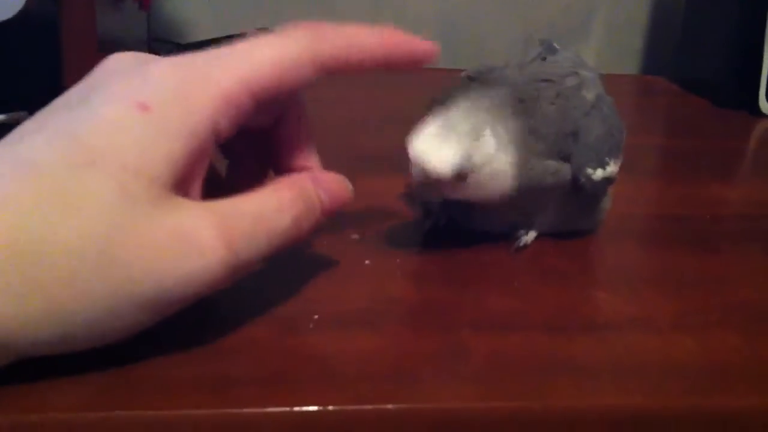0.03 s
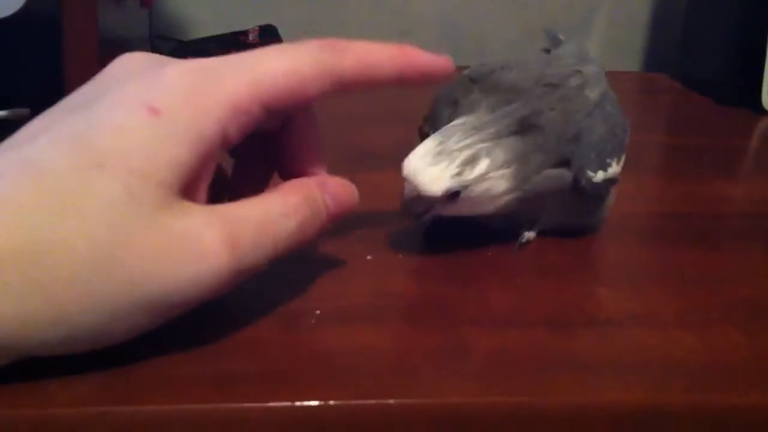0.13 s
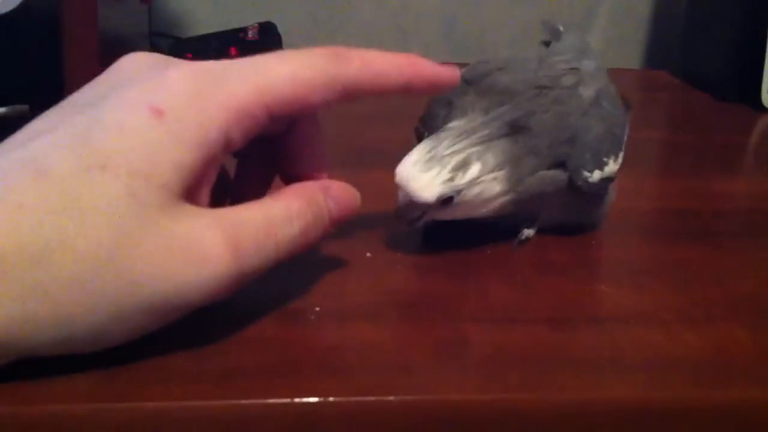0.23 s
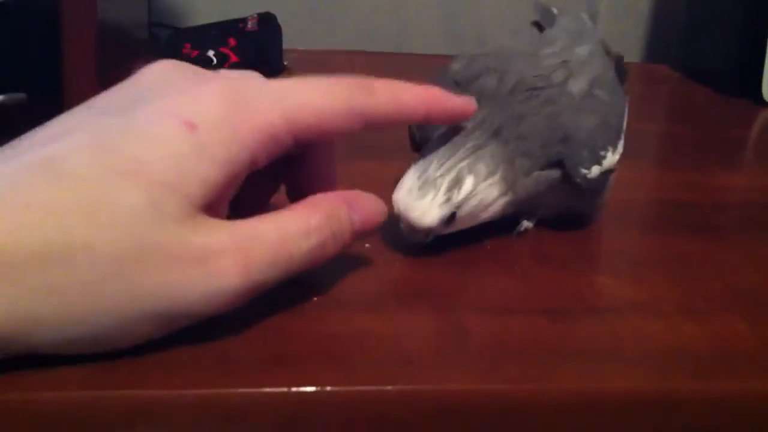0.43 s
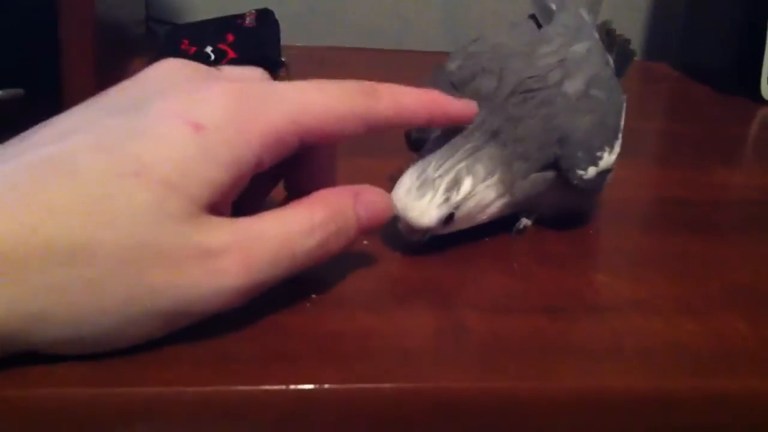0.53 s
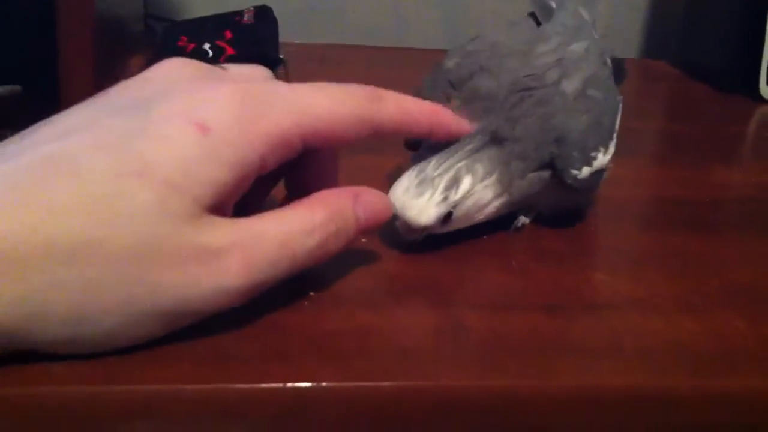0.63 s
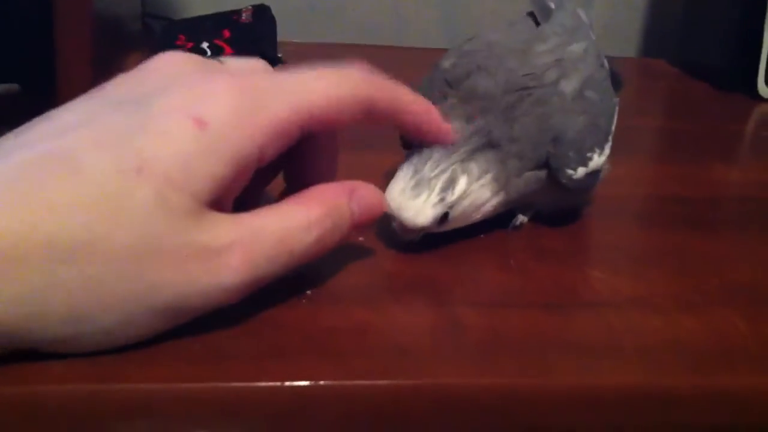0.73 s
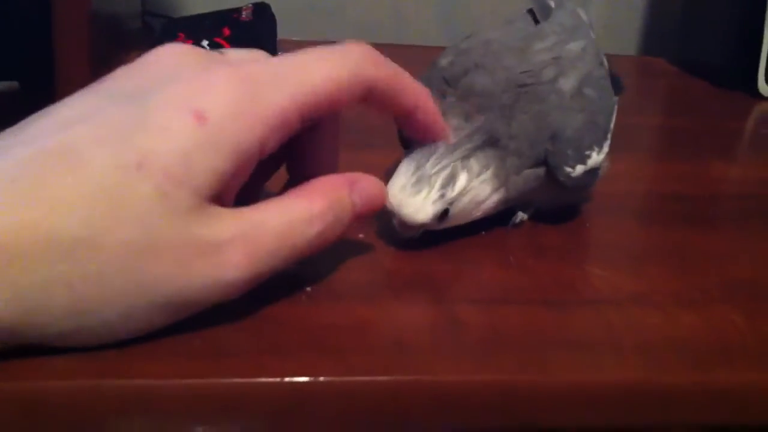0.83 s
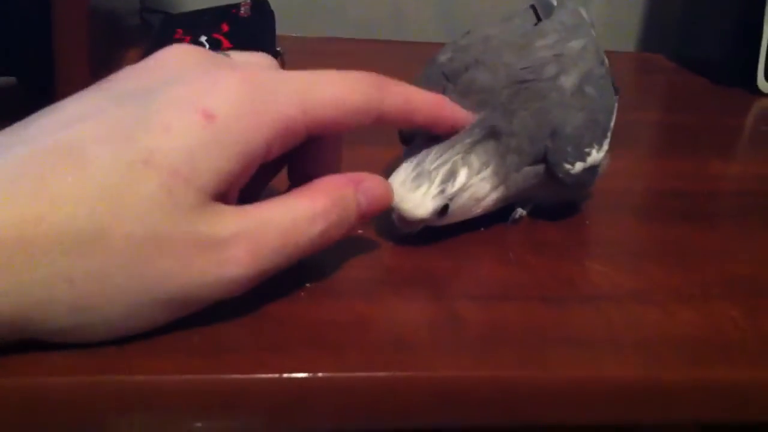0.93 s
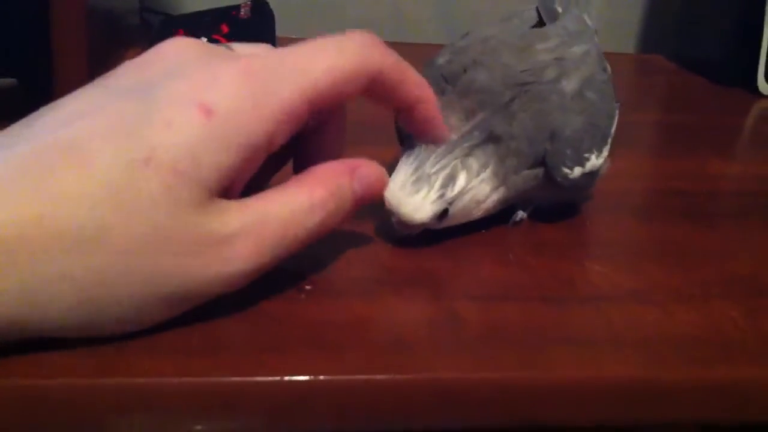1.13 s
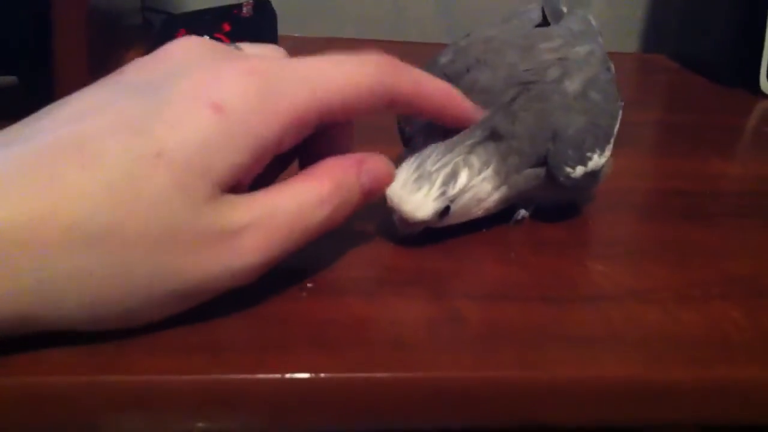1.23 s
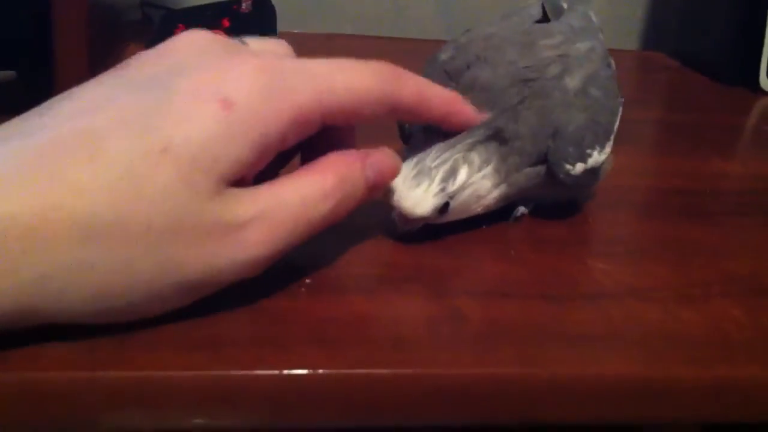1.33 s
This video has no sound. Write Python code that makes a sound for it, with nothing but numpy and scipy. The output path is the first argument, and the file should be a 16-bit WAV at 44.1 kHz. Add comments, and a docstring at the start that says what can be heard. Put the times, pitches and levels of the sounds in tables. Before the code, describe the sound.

A cockatiel close by gives a brief, hoarse, crackling hiss that tightens into a few broken squeaks, then one louder, very short squawk. The small room is quiet, with a faint fan and electrical hum.

```python
"""A hoarse, crackling hiss tightens into a few broken squeaks, then one very short, sharp squawk.
It is a cockatiel on a wooden table in a small quiet room, protesting at being touched.
The hiss is air rushing through its throat; the squeaks and squawk come from a trembling membrane
in its voice box. The room rings briefly; a fan and mains hum sound faintly behind."""
import sys
import numpy as np
from scipy import signal
from scipy.fft import rfft, irfft
from scipy.io import wavfile
from scipy.ndimage import uniform_filter1d, map_coordinates

SR = 44100
rng = np.random.default_rng(int(sys.argv[2]) if len(sys.argv) > 2 else 0)


def log_audio(samples):
    """Write samples as a 16-bit WAV file to the path given in sys.argv[1]."""
    # one column per channel
    frames = np.atleast_2d(samples).T
    # limit to full scale, then quantise
    limited = np.clip(frames, -1, 1)
    pcm = np.round(limited * 32767).astype(np.int16)
    wavfile.write(sys.argv[1], SR, pcm)


N = 61739
T = np.arange(N) / SR

# The throat's upper resonances (frequencies at which it rings), shared by the hiss and its crackles.
# Each row: frequency in Hz, relative width, relative level in dB.
UPPER_RESONANCES = [(3996, 264, 6), (4380, 470, -0.5), (4750, 790, -4.5), (7470, 610, -14),
                    (11570, 690, -20.5)]


def from_db(db):
    """Turn decibels into a factor to multiply by."""
    return 10 ** (np.asarray(db) / 20)


def rms_one(x):
    """Scale a signal to an average power of 1."""
    return x / np.sqrt(np.mean(x ** 2) + 1e-20)


def in_time(rows):
    """Join rows that start with a time into one curve for each further column."""
    times, *columns = np.transpose(rows)
    return [np.interp(T, times, column) for column in columns]


def during(rows):
    """One between the first and last row's times, zero outside, with soft edges."""
    return uniform_filter1d(1. * ((T > rows[0][0]) & (T < rows[-1][0])), size=32)


def at_hz(rows, hz, column=1):
    """Look up a value between rows that start with a frequency, on a log scale."""
    rows = np.array(rows)
    return np.interp(np.log(hz), np.log(rows[:, 0]), rows[:, column])


def drift(rate_hz):
    """A smooth random wobble with a typical size of 1."""
    r = np.exp(-2 * np.pi * rate_hz / SR)
    return rms_one(signal.lfilter([1], [1, -2 * r, r * r], rng.standard_normal(2 * N))[N:])


def resonate(x, hz, width):
    """Let through the sound near one frequency; filtering twice makes the sides steep."""
    r = np.exp(-np.pi * width / SR)
    b = (1 - r * r) / 2 * np.array([1, 0, -1])
    a = [1, -2 * r * np.cos(2 * np.pi * hz / SR), r * r]
    return signal.lfilter(b, a, signal.lfilter(b, a, x))


def coloured_noise(spectrum):
    """Noise of power 1 with the given balance of low and high frequencies."""
    hz = np.maximum(np.fft.rfftfreq(N, 1 / SR), 1)
    return rms_one(irfft(rfft(rng.standard_normal(N)) * from_db(at_hz(spectrum, hz)), N))


def mains_hum():
    """The mains supply hums in three low tones that waver slightly in level."""
    # Each row: frequency in Hz, level in dB.
    tones = [(120, -74.5), (240.3, -72), (361, -76.5)]
    waver_db = 0.85
    hum = np.zeros(N)
    for hz, db in tones:
        level = from_db(db + waver_db * drift(rate_hz=2.3))
        hum += level * np.sqrt(2) * np.sin(2 * np.pi * (hz * T + rng.random()))
    return hum


def fan():
    """A fan's soft rush of air, with a few narrow resonances in it."""
    # The broad rush. Each row: frequency in Hz, relative level in dB.
    rush_spectrum = [(25, -33), (60, -27.5), (105, -25.5), (160, -9), (240, -10), (340, -8), (490, -7.5),
                     (660, -11.5), (900, -9), (1200, -11.5), (1550, -13.5), (2400, -17.5), (3300, -20),
                     (4400, -18), (7000, -26), (10000, -27.5), (12500, -25.5), (16000, -32.5)]
    # Each row: frequency in Hz, filter width in Hz, level in dB.
    resonances = [(483.5, 32, -74.5), (753, 26, -73.5), (842.8, 27, -70.5), (1043, 34, -75.5),
                  (1195, 38, -72), (2580, 16, -75.5)]
    ringing = sum(from_db(db) * rms_one(resonate(rng.standard_normal(2 * N), hz, width)[N:])
                  for hz, width, db in resonances)
    return from_db(-59.5) * coloured_noise(rush_spectrum) + ringing


def room(x):
    """Countless reflections in the room build up and die away, sooner in the treble."""
    # Each row: frequency in Hz, level in dB, seconds to fade by 60 dB.
    ring = [(494, -2, .35), (1300, -4, 0.3), (2800, -11.5, 0.36), (5260, -17, 0.34), (8000, -8.5, 0.2),
            (15000, -28, 0.23)]
    delay_s, build_s = 0.004, 0.01
    build = np.clip((T - delay_s) / build_s, 0, 1)
    edges_hz = np.geomspace(400, 17000, num=12)
    response = np.zeros(N)
    for low, high in zip(edges_hz, edges_hz[1:]):
        hz = np.sqrt(low * high)
        band_filter = signal.butter(2, [low, high], "band", fs=SR, output="sos")
        band = signal.sosfilt(band_filter, rng.standard_normal(N))
        tail = band * build * np.exp(-np.log(1000) * T / at_hz(ring, hz, column=2))
        band_share = np.sqrt(2 * (high - low) / SR / N)
        response += from_db(at_hz(ring, hz)) * rms_one(tail) * band_share
    return signal.fftconvolve(x, response)[:N]


def echoes(x):
    """The sound bounces off the table, the hand and the walls, coming back slightly duller."""
    # Each row: delay in seconds, level in dB.
    bounces = [(.0011, -17), (.0034, -17), (.0093, -19), (0.0206, -20.5), (0.0272, -20.5), (.045, -22)]
    dull = signal.sosfilt(signal.butter(1, .45 * SR, fs=SR, output="sos"), x)
    return sum(from_db(db) * np.interp(T - delay, T, dull, left=0) for delay, db in bounces)


def voice_box(pitch, jitter, throat=np.ones_like, count=12):
    """A trembling membrane makes harmonics (multiples of its pitch); the throat sets their strengths."""
    shaky_pitch = pitch * (1 + jitter * drift(rate_hz=508))
    phase = 2 * np.pi * np.cumsum(shaky_pitch) / SR
    harmonic = np.arange(1, count + 1)[:, None]
    gains = throat(harmonic * pitch) * (harmonic * pitch < SR / 2)
    waves = np.sin(harmonic * phase + rng.uniform(0, 2 * np.pi, (count, 1)))
    return np.sum(gains * waves, axis=0) / np.sqrt(np.sum(gains ** 2, axis=0) / 2)  # power of 1


def crackles():
    """The breath catches in the throat, and each tiny puff rings its upper resonances."""
    # Each row: start in seconds, level in dB.
    puffs = [(.2545, -43), (.2605, -48), (.2712, -49), (0.2746, -39), (.293, -44), (0.3303, -33.5),
             (.336, -37), (0.3707, -34), (.481, -24.5), (0.4844, -27.5)]
    decay_s = 0.00072
    force = sum(from_db(db) * (T > start) * np.exp(-np.abs(T - start) / decay_s) for start, db in puffs)
    air = rng.standard_normal(N)

    def throat(x):
        return sum(from_db(db) * resonate(x + 1e-18, hz, width * 2) for hz, width, db in UPPER_RESONANCES)
    return throat(force * air) / np.std(throat(air))


def whistle():
    """A fluttering tone inside the hiss, clearest as its pitch falls."""
    # Each row: time in seconds, pitch in Hz, level in dB, roughness from 0 to 1.
    course = [(.285, 4000, -58, 1), (.305, 4100, -45, 1), (.336, 4180, -46, 1), (.344, 4650, -43, .4),
              (.35, 4560, -43, .2), (.356, 4020, -40, .15), (.364, 3970, -39, .15), (.376, 4000, -45, .7),
              (.39, 4000, -60, 1)]
    flutter_hz, flutter_depth = 700, .45
    pitch, level_db, roughness = in_time(course)
    flutter = 1 + flutter_depth * np.sin(2 * np.pi * flutter_hz * T + drift(rate_hz=110))
    tone = voice_box(pitch, jitter=.025 * roughness, count=1)
    return from_db(level_db) * during(course) * flutter * tone


def hiss():
    """Rushing air and uneven rasping pulses ring the throat, whose resonances rise as the beak opens."""
    # The force of the breath. Each row: time in seconds, level in dB.
    breath = [(.186, -54), (.189, -48.5), (.205, -44), (.25, -46), (.277, -43.5), (.335, -44), (.385, -41),
              (.402, -45.5), (.425, -46), (.44, -44), (.475, -48.5), (.484, -38), (.497, -55)]
    # The beak opens and closes. Each row: time in seconds, shift of the lower resonances in octaves,
    # shift of the upper ones in octaves, boost of the upper ones in dB.
    beak = [(.188, -0.34, -0.037, -12), (.215, -0.21, -.02, -7), (.28, -0.082, 0.0065, -1),
            (.34, 0.054, 0.062, 1), (.39, 0, .03, -3.5), (.43, -0.088, 0.04, -4), (.49, .03, 0.028, 16)]
    # Each row: frequency in Hz before the beak shifts it, relative width, relative level in dB.
    lower_resonances = [(1195, 520, -8), (1576, 335, -5), (1833, 280, -3.5), (2160, 620, -6),
                        (2800, 570, -8.5)]
    pulses_per_s, rasp_db, spread_db = 310, -6, 3.5
    level_db, = in_time(breath)
    lower_octaves, upper_octaves, upper_db = in_time(beak)
    pulse_sizes = from_db(spread_db * np.minimum(rng.exponential(1, N), 3))
    rasp = from_db(rasp_db) * rms_one(pulse_sizes * (rng.random(N) < pulses_per_s / SR))

    def throat(resonances, octaves):
        stretch = 2 ** octaves.max()
        steady = sum(from_db(db) * resonate(rng.standard_normal(N) + rasp, hz * stretch, width * 1.69)
                     for hz, width, db in resonances)
        # Reading the steady sound at a changing speed slides all its resonances together.
        return map_coordinates(steady, [np.cumsum(2 ** octaves / stretch)], order=5)
    lower = throat(lower_resonances, lower_octaves)
    upper = throat(UPPER_RESONANCES, upper_octaves)
    power = np.var(lower) + np.var(upper) * from_db(upper_db) ** 2
    rush = (lower + from_db(upper_db) * upper) / np.sqrt(power)
    return from_db(level_db) * during(breath) * rush


def squeaks():
    """The voice breaks from note to note; the throat favours one harmonic and a few faint higher ones."""
    # Each row: start and length in seconds; first, middle and last pitch in Hz; level and swell in dB;
    # throat resonance in Hz; level in dB of an added pure tone at the pitch; pitch wobble as a fraction.
    notes = [(0.433, .0245, 1290, 1482, 1758, -42, 10, 4600, -52.5, .005),
             (0.453, 0.0093, 1860, 2180, 2000, -37.5, 5, 4180, -58, 0.017),
             (0.464, 0.0151, 1710, 1609, 1540, -33, 6.5, 5050, -59, .003),
             (0.481, 0.00575, 1650, 1594, 1500, -34.5, -4, 3260, -65, 0.076),
             (0.487, 0.0096, 1660, 1636, 1764, -32, -3, 3404, -55, 0.0041)]
    # Weaker throat resonances in every squeak. Each row: frequency in Hz, relative level in dB.
    overtones = [(7200, -20), (9500, -32), (11900, -23.5)]
    width_hz, fade_s = 520, 0.0012

    def peak(hz, centre):
        return 1 / (1 + ((hz - centre) / width_hz) ** 2) ** np.where(hz > centre, 2, 1)
    out = np.zeros(N)
    for start, length, first, middle, last, db, swell_db, throat_hz, pure_db, jitter in notes:
        def throat(hz):
            return peak(hz, throat_hz) + sum(from_db(top_db) * peak(hz, top) for top, top_db in overtones)
        progress = np.clip((T - start) / length, 0, 1)
        pitch = np.interp(progress, [0, .5, 1], [first, middle, last])
        fade = np.clip(np.minimum(progress, 1 - progress) * length / fade_s, 0, 1)
        voice = from_db(db + swell_db * (progress - .5)) * voice_box(pitch, jitter, throat, count=7)
        pure_tone = from_db(pure_db) * voice_box(pitch, jitter, count=1)
        out += fade * (voice + pure_tone)
    return out


def squawk():
    """One loud, breathy yelp from the voice box, brightest at its peak and rougher as its pitch falls."""
    # Each row: time in seconds, pitch in Hz, level in dB, roughness from 0 to 1, treble boost in dB.
    course = [(.5445, 1339, -35, 0.31, 4), (.5459, 1383, -24.5, 0.18, -5), (.5487, 1452, -24.5, 0.08, 1.5),
              (.552, 1374, -22.5, 0.25, 6), (.555, 1279, -27.5, 0.94, -3.5), (.5615, 1223, -29, 0.32, 3),
              (.564, 1230, -34, 0.53, -5.5)]
    # How the throat colours voice and breath. Each row: frequency in Hz, relative level in dB.
    colour = [(1250, -6.5), (1450, -6.5), (2450, -6.5), (2800, 0.5), (3700, -11), (4250, -3.5), (5000, 1),
              (5700, -6.5), (6400, -16), (7200, -16), (8600, -18.5), (9800, -36.5), (11800, -21.5),
              (14000, -27), (15500, -34)]
    treble_from_hz, air_db = 3600, -14
    pitch, level_db, roughness, treble_db = in_time(course)

    def throat(hz):
        return from_db(at_hz(colour, hz) + treble_db * (hz > treble_from_hz))
    voice = voice_box(pitch, jitter=0.059 * roughness, throat=throat)
    air = signal.sosfilt(signal.butter(2, 2500, "high", fs=SR, output="sos"), coloured_noise(colour))
    return from_db(level_db) * during(course) * (voice + from_db(air_db + treble_db) * air)


def scene():
    """The bird close by in its room, the same in both channels."""
    bird = hiss() + crackles() + whistle() + squeaks() + squawk()
    return np.tile(bird + echoes(bird) + room(bird) + mains_hum() + fan(), (2, 1))


def record(dry):
    """Cut away the very highest treble."""
    cutoff_hz = 16700
    return signal.sosfilt(signal.cheby2(16, 60, cutoff_hz, fs=SR, output="sos"), dry)


dry = scene()
out = record(dry)
log_audio(out)
```